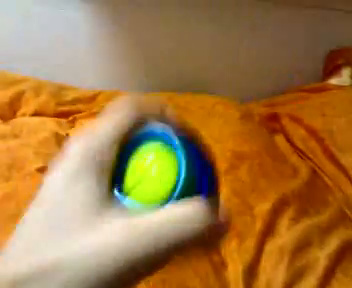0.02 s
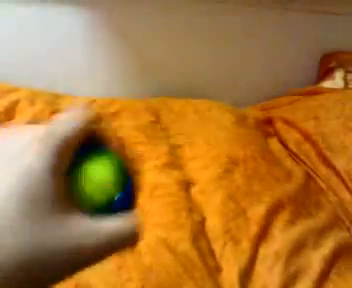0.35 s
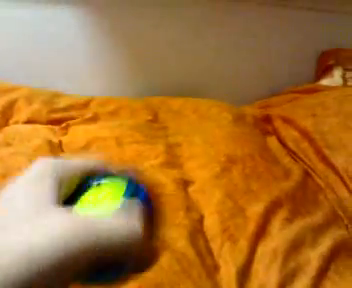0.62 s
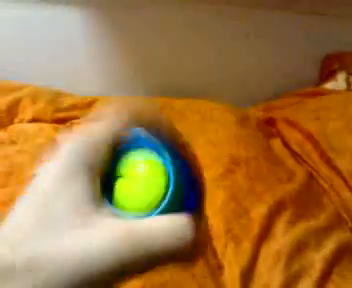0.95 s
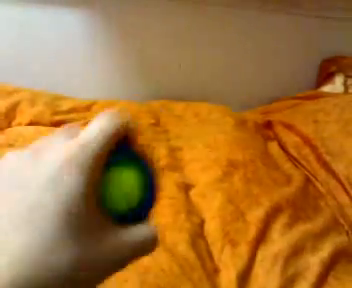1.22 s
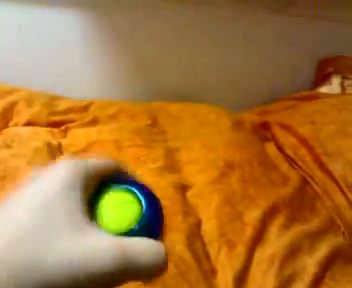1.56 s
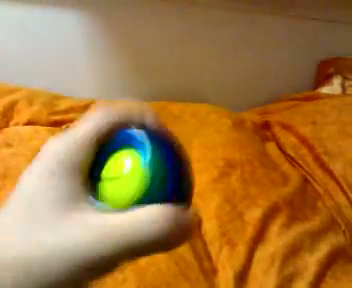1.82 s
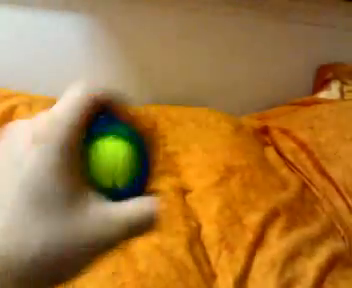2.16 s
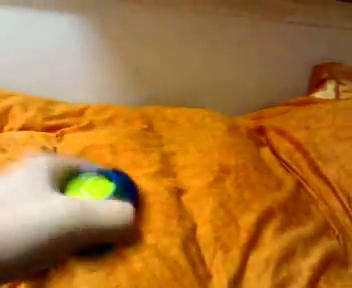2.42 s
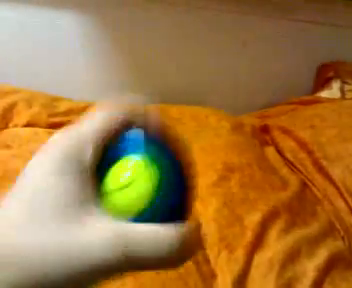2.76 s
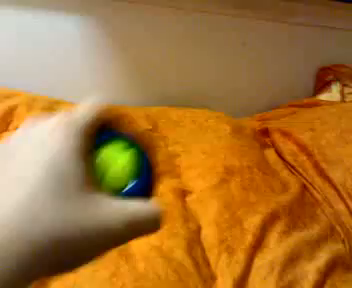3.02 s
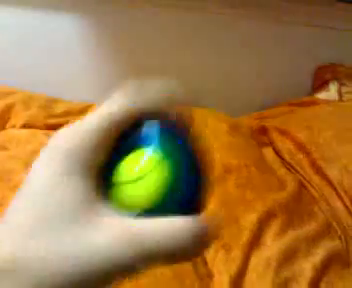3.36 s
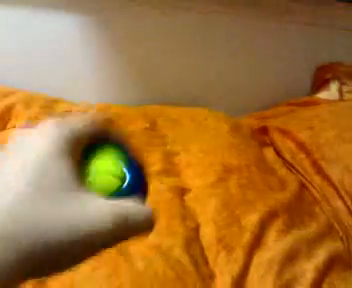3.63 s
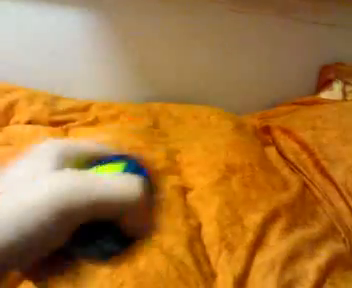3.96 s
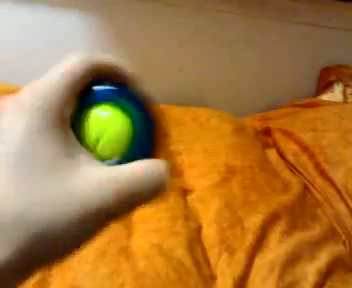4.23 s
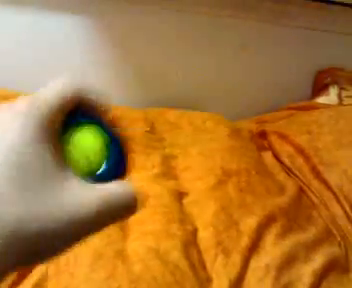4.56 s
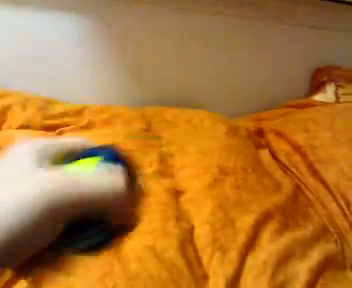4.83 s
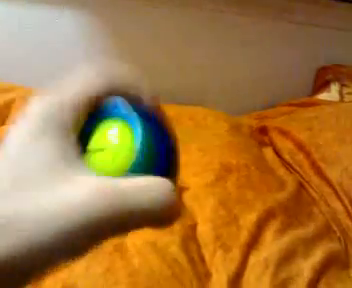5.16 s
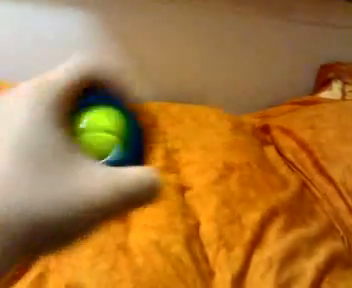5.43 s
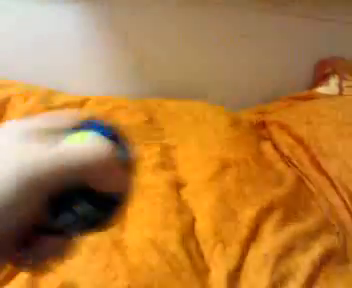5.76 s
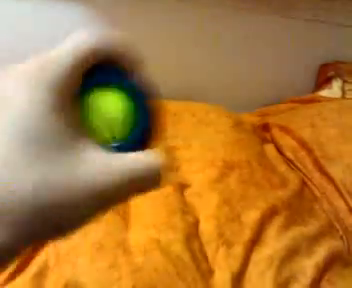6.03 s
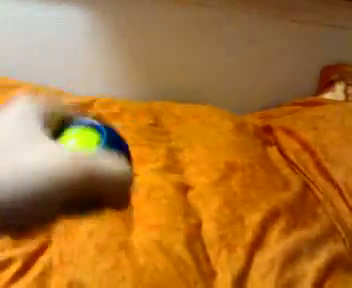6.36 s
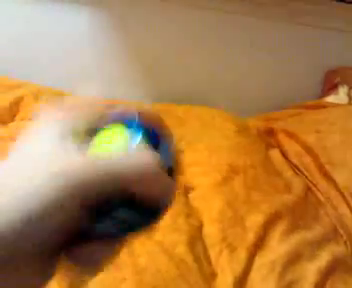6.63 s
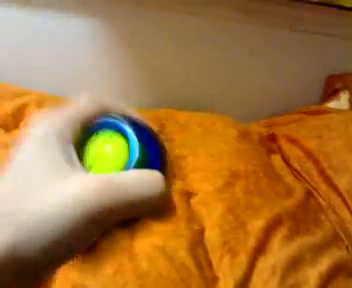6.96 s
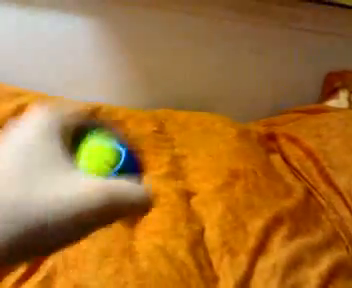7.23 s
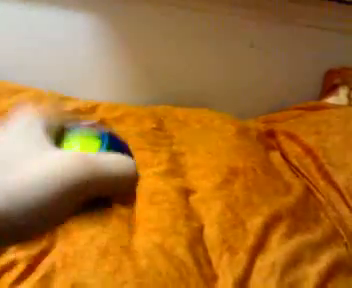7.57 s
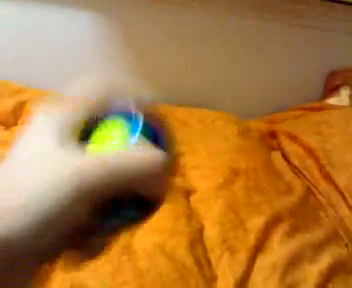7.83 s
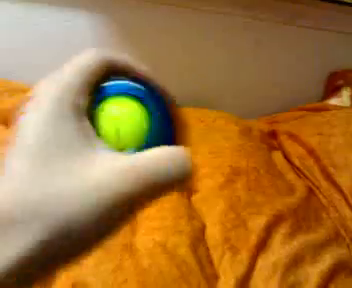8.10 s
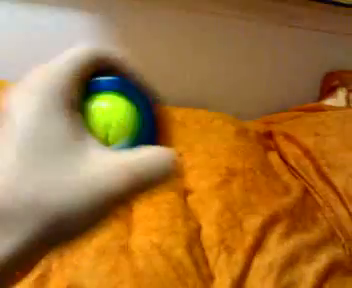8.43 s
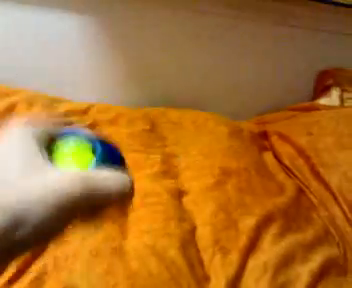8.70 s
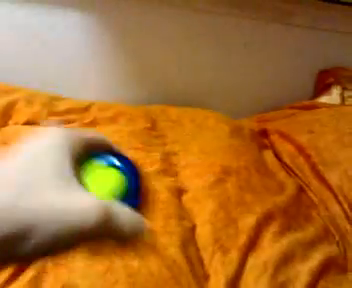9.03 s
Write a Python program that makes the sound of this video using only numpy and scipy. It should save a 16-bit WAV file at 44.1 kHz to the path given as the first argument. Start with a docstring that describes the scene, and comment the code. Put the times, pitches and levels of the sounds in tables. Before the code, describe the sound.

The rotor of a hand-held exercise ball spins throughout, making its plastic shell whirr in regular surges with a gritty rasp. Early on the axle gives brief, thin squeaks and ticks. From about halfway it skids and knocks in short clusters, while the whirr edges slightly higher. The sound is close and dry, picked up by a small microphone in a quiet room with soft hiss and a barely audible whine.

```python
"""Gyroscopic wrist ball in a bedroom

Swung round in one hand, close to a small camera microphone. The rotor's axle rolls in its groove and
makes the plastic shell whirr; each circle of the wrist presses it harder and eases off. As the rotor
gathers speed the axle scrapes, squeaks, skids and knocks. Faint room hiss and a thin whine lie beneath."""
import sys
import numpy as np
from scipy import signal
from scipy.fft import rfft, irfft, next_fast_len
from scipy.io import wavfile
from scipy.ndimage import uniform_filter1d

SR = 44100
rng = np.random.default_rng(int(sys.argv[2]) if len(sys.argv) > 2 else 0)


def digitize_waveform(pressure):
    """Quantize a signal to 16-bit integers and store it at the path in sys.argv[1].

    Rows of a 2-D input are taken as channels; values are limited to [-1, 1].
    """
    field = np.atleast_2d(pressure).T
    bounded = np.clip(field, -1, 1)
    quanta = np.round(bounded * 32767).astype(np.int16)
    wavfile.write(sys.argv[1], SR, quanta)


N = 409248
TIME = np.arange(N) / SR


def gain_of(db):
    """Decibels to a factor."""
    return 10 ** (np.asarray(db) / 20)


def unit_rms(x):
    """Scales to rms 1."""
    return x / np.sqrt(np.mean(x ** 2) + 1e-20)


def steadied(x, seconds):
    """Rms 1 over every stretch of this length, keeping the faster flutter."""
    return x / np.sqrt(abs(uniform_filter1d(x ** 2, int(seconds * SR))) + 1e-12)


def colour(x, spectrum, size=8192):
    """Causal filter of unit power with the given spectrum: it rings after a click, never before."""
    hz, db = np.transpose(spectrum)
    bin_hz = abs(np.fft.fftfreq(size, 1 / SR))
    log_gain = np.log(gain_of(np.interp(np.log(bin_hz + 1), np.log(hz), db)))
    ring = np.fft.ifft(np.exp(np.conj(signal.hilbert(log_gain)))).real[:size // 2]
    return signal.oaconvolve(x, ring / np.linalg.norm(ring))[:N]


def resonate(x, hz, width_hz):
    """A resonance that follows the curve hz."""
    phasor = np.exp(2j * np.pi * np.cumsum(hz) / SR)
    pole = np.exp(-np.pi * width_hz / SR)
    return 2 * (phasor * signal.lfilter([1 - pole], [1, -pole], x / phasor)).real


def waver(hz, step=8):
    """Random drift of rms 1, up to about hz."""
    size = next_fast_len(N // step + 2)
    rolloff = 1 + (np.fft.rfftfreq(size, step / SR) / hz) ** 4
    slow = irfft(rfft(rng.standard_normal(size)) / rolloff, size)
    return unit_rms(np.interp(np.arange(N) / step, np.arange(size), slow))


def swell(at, half_s):
    """A bell-shaped rise and fall around the time at."""
    out = np.zeros(N)
    near = slice(*np.searchsorted(TIME, [at - 5 * half_s, at + 5 * half_s]))
    out[near] = np.exp(-((TIME[near] - at) / half_s) ** 2 / 2)
    return out


# The rotor gathering speed: t/s, speed/(turns per s)
ROTOR_SPEED = [(0, 41), (1.2, 46), (2.8, 44), (4.2, 48), (5.6, 52), (7.0, 63), (7.8, 68.5), (8.6, 74),
               (8.9, 77.5), (9.28, 78.5)]

def rotor():
    """The spinning rotor: its speed and its slightly unsteady count of turns."""
    speed = np.interp(TIME, *np.transpose(ROTOR_SPEED))
    return speed, np.cumsum(speed * (1 + .005 * waver(12))) / SR


def contact(turns, spread_db=1.8, throb_db=1.3, hits_per_s=5000):
    """Tiny uneven impacts: the unbalanced rotor presses its axle on the gritty groove once a turn."""
    grit = np.zeros(N)
    hits = np.flatnonzero(rng.random(N) < hits_per_s / SR)
    grit[hits] = rng.standard_normal(len(hits))
    grit[hits] *= gain_of(spread_db * np.minimum(rng.exponential(1, len(hits)), 5))
    return unit_rms(grit * gain_of(throb_db * np.cos(2 * np.pi * turns)))


# Circles of the wrist, levels relative: push t/s, level/dB, half-length/s; follow-through delay/s,
# level/dB, half-length/s; coasting level/dB; whirr under the push f/Hz; fizz level/dB
WRIST_STROKES = [(0.176, -25.0, 0.043, 0.15, -28, 0.03, -30.5, 871, -49.5),
                 (0.58, -30, 0.053, 0.11, -32, 0.032, -30.5, 848.3, -55),
                 (1.037, -28, 0.044, 0.142, -28.5, 0.039, -34, 874.3, -45),
                 (1.458, -31, 0.038, 0.15, -29, 0.13, -35, 870, -48.5),
                 (1.871, -26.5, 0.021, 0.14, -27.5, 0.039, -32.5, 861.3, -48.5),
                 (2.326, -29.5, 0.036, 0.17, -29.5, 0.049, -32.5, 890.2, -49),
                 (2.832, -26.5, 0.042, 0.24, -28.0, 0.067, -43, 877.4, -53.5),
                 (3.367, -32.5, 0.056, 0.23, -25.0, 0.042, -33.5, 865.4, -52.5),
                 (3.898, -24.5, 0.025, 0.148, -31, 0.058, -37, 870.5, -49),
                 (4.368, -28.0, 0.043, 0.17, -35, 0.072, -35, 888.8, -49.5),
                 (4.784, -28, 0.032, 0.14, -31.5, 0.053, -38.5, 885, -54.5),
                 (5.223, -27, 0.051, 0.17, -29.5, 0.036, -40.5, 878.4, -48.5),
                 (5.684, -28.5, 0.05, 0.197, -32.5, 0.068, -36.5, 861.5, -57),
                 (6.275, -29, 0.059, 0.18, -35.5, 0.074, -38.5, 891.1, -48.5),
                 (6.672, -28, 0.037, 0.14, -32, 0.029, -32, 884.6, -51.5),
                 (7.092, -33.5, 0.042, 0.16, -31.5, 0.06, -40, 901, -53),
                 (7.474, -32.5, 0.045, 0.144, -31, 0.038, -34.5, 916.5, -49.0),
                 (7.902, -27.5, 0.021, 0.122, -31, 0.048, -37.0, 911.5, -48),
                 (8.292, -28, 0.023, 0.116, -32.5, 0.053, -38.5, 922, -52.5),
                 (8.662, -28.5, 0.032, 0.147, -33, 0.061, -38.5, 924.3, -52.0),
                 (9.06, -32.5, 0.052, 0.15, -33.5, 0.048, -40, 928.5, -52.5)]
# One circle, from the push: position/circle, pitch release/0-1, rasp swing/dB, fizz swing/dB
CIRCLE_SHAPE = [(0, 0.04, 2.5, -2), (.12, .35, 2, 0), (.25, 0.99, 7, 4.5), (0.421, .9, 8.5, -1),
                (.6, .9, 6, -8.5), (.75, .9, 7, -3.5), (.9, .2, 1.5, -3.5)]
# The axle bites and the shell sings out for a moment: t/s, relative level/dB
AXLE_BITES = [(0.061, -23), (0.091, -25.5), (0.131, -21.5), (0.235, -21.0), (0.725, -20), (0.746, -19),
              (0.862, -25), (1.078, -21.5), (1.124, -22), (1.386, -22), (1.415, -23), (1.533, -24),
              (1.593, -23), (1.631, -20.0), (2.425, -23.5), (2.806, -21.0), (2.858, -16.5), (2.937, -24.5),
              (3.293, -22.5), (3.373, -16.5), (3.431, -25.5), (3.862, -23.5), (4.799, -19), (4.935, -21.5),
              (5.893, -26.5), (6.233, -28.5), (7.087, -21), (7.458, -20.5), (7.911, -21.5), (8.273, -23.5)]
# The axle drags and the whirr groans downward: t/s, drop/Hz
AXLE_GROANS = [(.81, 45), (3.44, 80)]

def wrist(speed, coast_after_s=.3, flutter_db=1.1, sag_hz_per_db=.7):
    """The circling wrist loads the axle, setting the whirr's level and pitch and the friction's levels."""
    push_times, *_, coast_db, push_hz, stroke_fizz_db = np.transpose(WRIST_STROKES)
    edges = np.r_[2 * push_times[0] - push_times[1], push_times, 2 * push_times[-1] - push_times[-2]]
    circles = np.interp(TIME, edges, np.arange(-1, len(push_times) + 1))
    position, *shapes = np.transpose(CIRCLE_SHAPE)
    release, rasp_swing, fizz_swing = [np.interp(circles, position, c, period=1) for c in shapes]

    power = np.interp(TIME, push_times + coast_after_s, gain_of(coast_db - .6) ** 2)
    for at, push_db, push_s, delay_s, follow_db, follow_s, *_ in WRIST_STROKES:
        power += gain_of(push_db) ** 2 * swell(at, push_s)
        power += gain_of(follow_db) ** 2 * swell(at + delay_s, follow_s)
    power *= gain_of(flutter_db * waver(30)) ** 2  # uneven grip
    power += sum(gain_of(db) ** 2 * swell(at, half_s=.0039) for at, db in AXLE_BITES)
    level_db = 10 * np.log10(power) - 1.8

    free_hz = 852 + 1.6 * speed  # between pushes the pitch follows the rotor
    pitch_hz = (1 - release) * np.interp(TIME, push_times, push_hz) + release * free_hz
    sudden_load_db = uniform_filter1d(level_db, 2000) - uniform_filter1d(level_db, 20000)
    pitch_hz -= sag_hz_per_db * sudden_load_db
    pitch_hz -= sum(drop_hz * swell(at, half_s=.02) for at, drop_hz in AXLE_GROANS)

    rasp_db = -56 + .5 * TIME + rasp_swing
    fizz_db = -3.3 + np.interp(TIME, push_times, stroke_fizz_db) + fizz_swing
    return level_db, pitch_hz, rasp_db, fizz_db


# The shell's main resonance and its skirts: f/Hz, relative level/dB
SHELL_SPECTRUM = [(300, -45.5), (620, -22.5), (700, -10), (790, -1.5), (830, 8.5), (910, 4.5), (1000, -1),
                  (1100, -3), (1250, -22), (1600, -29)]

def whirr(turns, level_db, pitch_hz, tonal_above_db=-29.8):
    """Close up, the rolling axle rings the shell: a burr under light load, nearly a tone under heavy."""
    bumps = np.diff(np.floor(turns + .15 * waver(30)), prepend=0)  # about one a turn
    bumps *= gain_of(2.5 * waver(25))
    drive = .7 * unit_rms(bumps) + contact(turns)
    ring = resonate(drive, pitch_hz, width_hz=98)
    ring = resonate(ring, pitch_hz + 40, width_hz=440)
    burr = steadied(colour(ring, SHELL_SPECTRUM), seconds=.032)
    cycles = np.cumsum(pitch_hz + 30 * waver(45)) / SR
    tremble = 1 + .26 * waver(60) + .2 * np.sin(2 * np.pi * turns)
    tone = steadied(np.sin(2 * np.pi * cycles) * tremble, seconds=.03)
    tone_share = .93 / (1 + np.exp((tonal_above_db - level_db) / 1.6))
    return (np.sqrt(tone_share) * tone + np.sqrt(1 - tone_share) * burr) * gain_of(level_db)


# The hollow of ball and hand: f/Hz, relative level/dB
HOLLOW_SPECTRUM = [(60, -30.5), (150, -9.5), (300, -5.5), (380, -7.5), (415, -0.5), (538, 1), (563, -10),
                   (598, -2.5), (640, -14), (730, 3), (1000, -23.5)]

def hollow(turns, level_db, pitch_hz):
    """A lower, weaker resonance of ball and hand takes a share of the whirr's swings."""
    low_hz = 505 * (pitch_hz / 900) ** 1.8 * (1 + .06 * waver(7))
    rolling = contact(turns)
    ring = resonate(rolling, low_hz, width_hz=50)
    body = unit_rms(colour(rolling + 1.3 * ring, HOLLOW_SPECTRUM))
    swing_db = .27 * (level_db - level_db.mean())
    return body * gain_of(-48 - .0755 * TIME + swing_db)


# Rasp of the groove: f/Hz, relative level/dB
RASP_SPECTRUM = [(600, -12.5), (1150, 2), (1420, -3), (1550, 0), (1660, -6.5), (1800, 0.5), (2020, 2.5),
                 (2300, 0), (2650, -4), (3100, -19), (3800, -9), (5000, -35)]
# Fine grit of the groove: f/Hz, relative level/dB
FIZZ_SPECTRUM = [(2000, -2.5), (3200, 3), (3700, 2), (4080, 9.5), (4270, 4.5), (4470, 10.5), (4900, -3),
                 (5500, -4.5), (6100, 8), (6450, 2), (6800, 8), (7400, -6.5)]

def groove(turns, rasp_db, fizz_db):
    """Dry rolling noise: a rasp in the middle, and above it a fine fizz in gritty patches."""
    rasp = colour(contact(turns), RASP_SPECTRUM) * gain_of(rasp_db)
    fizz = colour(contact(turns, spread_db=3), FIZZ_SPECTRUM) * gain_of(fizz_db + 1.8 * waver(22))
    return rasp + fizz


def bedroom(x, t60=.1, taps_per_s=2000):
    """Sparse reflections of a small, soft room reach the microphone just after the direct sound."""
    t = np.arange(SR // 3) / SR
    taps = rng.choice([-1., 1.], len(t)) * (rng.random(len(t)) < taps_per_s / SR)
    taps *= (t > .004) * gain_of(-60 * t / t60)
    return signal.oaconvolve(x, taps / np.linalg.norm(taps))[:N]


# Noise floor of room and microphone: f/Hz, relative level/dB
HISS_SPECTRUM = [(20, 9), (80, 6.5), (130, 2), (300, 5), (700, -14.5), (2000, 2), (5000, -9), (7500, -16)]

def room_tone():
    """The quiet bedroom and the microphone's own hiss."""
    return gain_of(-54.5) * colour(rng.standard_normal(N), HISS_SPECTRUM)


# Electrical whine behind the microphone: f/Hz, level/dB
WHINE_TONES = [(4980, -75), (5273, -77), (5859, -67.5), (6152, -71), (6445, -73), (6738, -71)]

def whine():
    """Thin steady tones from the camera's electronics."""
    return sum(gain_of(db) * np.sin(2 * np.pi * hz * TIME) for hz, db in WHINE_TONES)


# The axle scrapes along the groove: t/s, half-length/s, relative level/dB, crest f/Hz, width/Hz
AXLE_SCRAPES = [(0.09, 0.11, -49, 2320, 900), (0.45, 0.06, -49, 1940, 396), (0.647, 0.063, -46, 2500, 1000),
                (1.103, 0.15, -43, 2210, 940), (1.71, 0.093, -43.5, 2300, 1050),
                (2.148, 0.14, -45.5, 2156, 950), (2.648, 0.084, -48, 1980, 402),
                (2.85, 0.076, -47.5, 2330, 650), (3.19, 0.16, -47.5, 2400, 650),
                (3.722, 0.095, -45.5, 2084, 450), (4.23, 0.034, -42, 2005, 400),
                (4.503, 0.11, -44.5, 2230, 1300), (4.653, 0.048, -42.5, 1980, 395),
                (4.964, 0.08, -46, 2040, 450), (5.108, 0.035, -43.5, 2090, 550),
                (5.29, 0.12, -44.5, 2240, 840), (5.506, 0.043, -49.5, 2250, 740),
                (5.995, 0.074, -41, 2350, 920), (6.01, 0.039, -50, 2980, 1500),
                (6.383, .06, -42.5, 2140, 900), (6.527, 0.04, -41.5, 1990, 447),
                (6.936, 0.051, -41, 2000, 450), (7.278, 0.11, -42.5, 2030, 590),
                (7.49, 0.078, -41, 2250, 780), (7.72, 0.072, -43, 1960, 430),
                (8.096, 0.12, -42.5, 2200, 890), (8.475, 0.1, -41.5, 1940, 600),
                (8.882, 0.036, -46, 2010, 500), (9.093, 0.071, -46, 2240, 830)]

def scrapes(turns, pitch_drop=.11, trim_db=-1):
    """Swells of friction: a resonance of the groove rises with the pressure and sinks again."""
    out = np.zeros(N)
    rolling = contact(turns, spread_db=4)
    for at, half_s, db, hz, width_hz in AXLE_SCRAPES:
        near = slice(*np.searchsorted(TIME, [at - 3 * half_s, at + 3 * half_s]))
        pressure = np.exp(-abs((TIME[near] - at) / half_s) ** 2.5 / 3)
        centre_hz = hz * (1 - pitch_drop * (1 - pressure))
        ring = rolling[near]
        for widening in (1, 1, 2):
            ring = resonate(ring, centre_hz, widening * width_hz)
        out[near] += gain_of(db + trim_db) * pressure * unit_rms(ring)
    return out


# Sizzle of the hard-pressed axle: f/Hz, relative level/dB
SIZZLE_SPECTRUM = [(3000, -32.5), (4200, -4), (5300, -24), (6100, 2.5), (6800, 7), (7500, -16)]

def sizzle(turns, lead_s=.027):
    """The axle's thin, high hiss swells with every push, a little fainter each time."""
    pressed = sum(swell(at - lead_s, half_s=.071) for at, *_ in WRIST_STROKES)
    return colour(contact(turns), SIZZLE_SPECTRUM) * pressed * gain_of(-55 - .62 * TIME)


# The plastic squeaks: t/s, f/Hz, level/dB, half-length/s
PLASTIC_SQUEAKS = [(0.105, 3980, -43, .007), (0.61, 4100, -37, .005), (.747, 4470, -34, 0.0044),
                   (1.053, 3920, -35, 0.0037), (1.073, 3980, -38, 0.0038), (1.577, 4140, -42, 0.006),
                   (1.607, 4530, -40, .007), (2.055, 5930, -37.5, 0.0039), (2.252, 4490, -46, 0.0064),
                   (2.488, 4470, -43, .008), (3.575, 4300, -42.5, 0.0095), (4.405, 4430, -44.5, 0.013)]

def squeaks():
    """The axle sticks and slips for a moment with a thin, ragged pitch."""
    at, hz, db, half_s = np.transpose(PLASTIC_SQUEAKS)
    nearest = np.searchsorted((at[1:] + at[:-1]) / 2, TIME)
    cycles = np.cumsum(hz[nearest] * (1 + .021 * waver(600))) / SR
    strength = gain_of(db[nearest]) * np.exp(-((TIME - at[nearest]) / half_s[nearest]) ** 2 / 2)
    return strength * np.sin(2 * np.pi * cycles) * (1 + .55 * waver(400))


# The axle skids: t/s, relative level/dB, length/s, tilt toward the treble/dB
AXLE_SKIDS = [(0.254, -44.5, .02, 2), (0.603, -35.5, 0.012, 3), (0.65, -39, 0.052, -0.5),
              (0.75, -35, 0.033, -4), (1.044, -36.5, 0.011, 8), (1.075, -34.5, 0.0092, 0),
              (1.149, -36, 0.017, -9), (1.58, -42, 0.0094, 3), (1.607, -37.5, 0.046, 2),
              (2.057, -35.5, 0.019, 2), (2.401, -40, 0.017, -1), (2.503, -41, 0.03, -1.5),
              (3.004, -44.5, 0.022, 3), (3.613, -44, 0.057, -0.5), (4.049, -32.5, .012, -5),
              (4.487, -35.5, 0.033, -6), (4.588, -38, 0.0026, 9), (4.631, -43, 0.042, -9),
              (5.366, -33, 0.022, -3.5), (6.368, -32, 0.031, -7), (6.799, -35, 0.059, -7),
              (7.234, -44, 0.1, -9), (7.556, -39.5, 0.013, -11), (7.6, -37.5, 0.052, -26),
              (8.017, -34, 0.056, -13), (8.399, -31, 0.029, -14.5), (8.782, -35, .011, -5),
              (8.813, -34, 0.047, -9)]
# Onset of a skid: offset from its centre/lengths, strength/0-1
SKID_ONSET = [(-1.5, 0.24), (-0.88, 0.43), (-0.93, 1)]
# A skid below the treble: f/Hz, relative level/dB
SKID_SPECTRUM = [(60, -39.5), (150, -20), (380, -6.5), (520, 2.5), (620, -5), (780, 6.5), (1000, 8.5),
                 (1300, -9), (1600, -4), (1900, 4), (2300, -2), (2900, -20.5), (3600, -17.5), (5000, -51.5)]

def skids(turns, middle_boost_db=5):
    """Short bursts of chatter: the axle loses its grip at once and settles more slowly."""
    middle, treble = np.zeros((2, N))
    for at, db, length_s, tilt_db in AXLE_SKIDS:
        near = abs(TIME - at) < 6 * length_s
        offset = (TIME[near] - at) / length_s
        burst = gain_of(db) * np.interp(offset, *np.transpose(SKID_ONSET)) / (1 + (2 * offset) ** 2)
        middle[near] += burst / np.hypot(1, gain_of(tilt_db)) * gain_of(middle_boost_db)
        treble[near] += burst / np.hypot(1, gain_of(-tilt_db))
    chatter = steadied(contact(turns, spread_db=4), seconds=.007)
    return colour(chatter * middle, SKID_SPECTRUM) + colour(chatter * treble, FIZZ_SPECTRUM)


# The axle knocks in the groove, peaks relative: t/s, ring level/dB, f/Hz, click level/dB
AXLE_KNOCKS = [(.6058, -31, 2100, -25), (.6092, -30, 2100, -27), (.6485, -27, 2100, -36),
               (.7452, -25.5, 1850, -26), (.7485, -30, 1650, -28), (2.0545, -27, 1900, -31),
               (4.0422, -18, 1850, -26), (4.0445, -27, 1800, -32), (4.4828, -21.5, 1810, -37),
               (4.4858, -24.5, 1900, -32), (5.3583, -21.5, 2020, -30), (5.3618, -22.5, 2250, -30),
               (5.365, -23, 1800, -31), (6.364, -19, 1910, -35), (6.3668, -21.5, 1650, -33),
               (6.8233, -12.5, 2100, -38), (6.827, -24, 1800, -48), (6.908, -23, 2000, -48),
               (7.2428, -17.5, 1860, -42), (7.2988, -28, 1910, -46), (7.3205, -23.5, 2250, -42),
               (7.5528, -27, 1990, -40), (7.6218, -17, 1980, -42), (7.6265, -22, 2000, -48),
               (7.6335, -23, 1900, -44), (7.7085, -17, 2010, -44), (7.9953, -24, 1770, -33),
               (8.009, -20, 1970, -26), (8.0205, -20.5, 2000, -42), (8.0337, -17.5, 1810, -40),
               (8.3885, -14, 1850, -29), (8.398, -22, 1900, -38), (8.7805, -22, 1800, -31),
               (8.7925, -27, 1900, -36), (8.8047, -23, 2000, -42), (8.817, -24, 1950, -27),
               (8.8295, -26, 2000, -44)]
# Modes that a knock rings: ratio to its pitch, relative level/dB, t60/s
RING_MODES = [(.47, -14, .025), (.83, -6.5, .016), (.97, 5, .014), (1.03, -7, .035), (1.15, -2, .012)]
# High shell modes that a hard click rings: f/Hz, relative level/dB, t60/s
HIGH_MODES = [(3400, -8.5, .008), (4120, -5, 0.0071), (4340, 6, 0.0089), (5690, -3, .012),
              (6900, -2.5, .01)]

def knocks(rise_s=.0005, ring_trim_db=-.5, click_trim_db=2):
    """Taps of the axle ring the plastic briefly, each with a slightly different high click on top."""
    out = np.zeros(N)
    t = np.arange(SR // 12) / SR
    band = signal.butter(2, [600, 3100], "bandpass", fs=SR, output="sos")
    for at, ring_db, pitch_hz, click_db in AXLE_KNOCKS:
        ring, click = np.zeros((2, len(t)))
        for ratio, db, t60 in RING_MODES:
            ring += gain_of(db - 60 * t / t60) * np.sin(2 * np.pi * ratio * pitch_hz * t)
        ring = signal.sosfilt(band, ring * np.minimum(t / rise_s, 1))
        for hz, db, t60 in HIGH_MODES:
            cycles = hz * rng.normal(1, .04) * t + rng.random()
            click += gain_of(db - 60 * t / t60) * np.sin(2 * np.pi * cycles)
        ring *= gain_of(ring_db + ring_trim_db) / abs(ring).max()
        click *= gain_of(click_db + click_trim_db) / abs(click).max()
        out[round(at * SR):][:len(t)] += ring + click
    return out


# Rotor tones: multiple of the speed, level at top speed/dB
ROTOR_TONES = [(7, -49), (8, -55), (10, -56), (11, -53), (13, -44), (14, -49), (15, -56)]

def hum(turns, speed):
    """Faint tones of the unbalance, which emerge as the rotor gathers speed."""
    tones = sum(gain_of(db + 2.5 * waver(3)) * np.sin(2 * np.pi * k * turns) for k, db in ROTOR_TONES)
    return tones * (speed / speed.max()) ** 4


def scene():
    """The ball close to the microphone, all driven by one rotor, with the bedroom faint behind it."""
    speed, turns = rotor()
    level_db, pitch_hz, rasp_db, fizz_db = wrist(speed)
    ball = whirr(turns, level_db, pitch_hz) + hollow(turns, level_db, pitch_hz)
    ball += groove(turns, rasp_db, fizz_db) + scrapes(turns) + sizzle(turns)
    ball += squeaks() + skids(turns) + knocks() + hum(turns, speed)
    return (ball + gain_of(-16) * bedroom(ball) + room_tone() + whine())[None]


def record(dry):
    """The narrow band of a small mono camera microphone, and its converter's steady offset."""
    edge_hz, dc_offset = 7550, .0726
    lowpass = signal.firwin(401, edge_hz, window=("kaiser", 8), fs=SR)
    return dc_offset + signal.oaconvolve(dry, lowpass[None], "same")


dry = scene()
out = record(dry)
digitize_waveform(out)
```